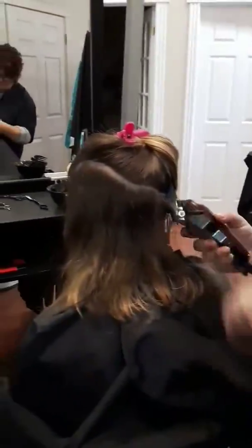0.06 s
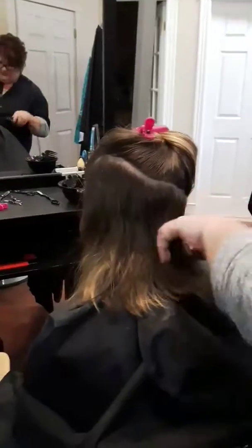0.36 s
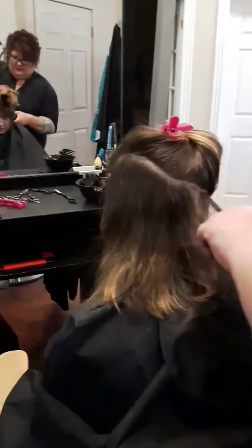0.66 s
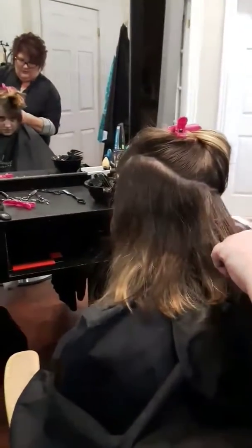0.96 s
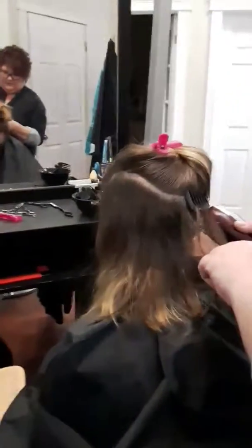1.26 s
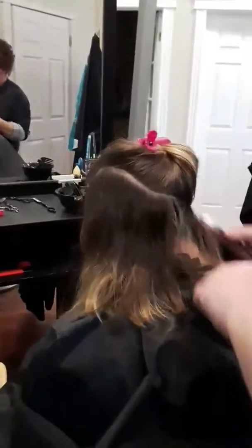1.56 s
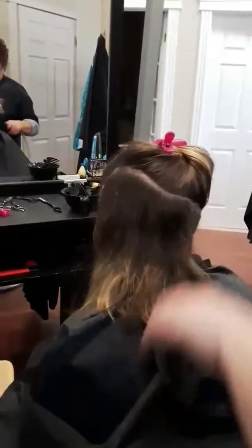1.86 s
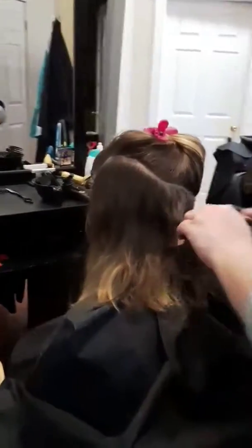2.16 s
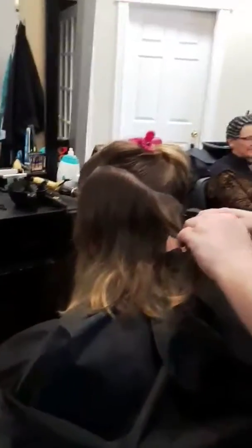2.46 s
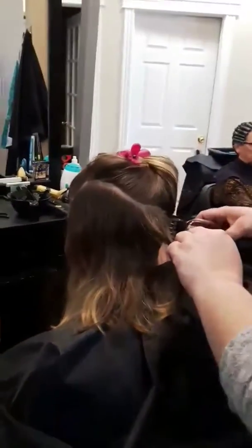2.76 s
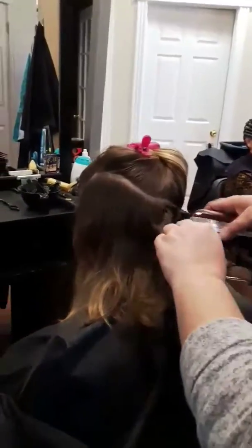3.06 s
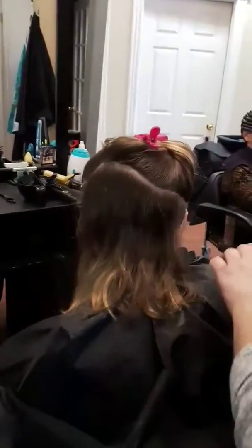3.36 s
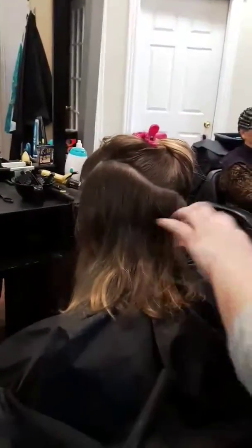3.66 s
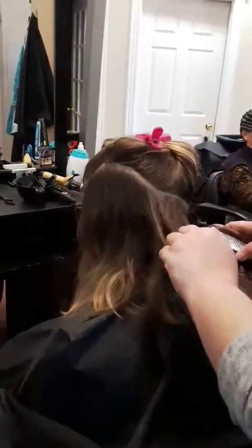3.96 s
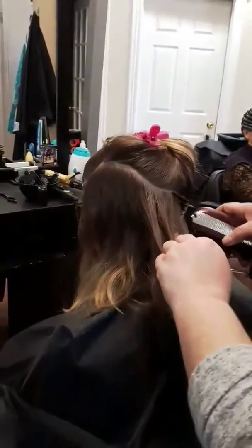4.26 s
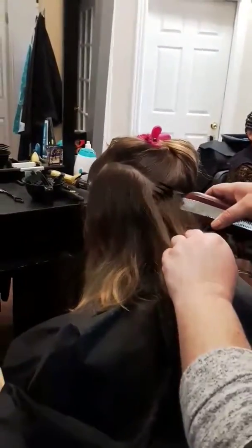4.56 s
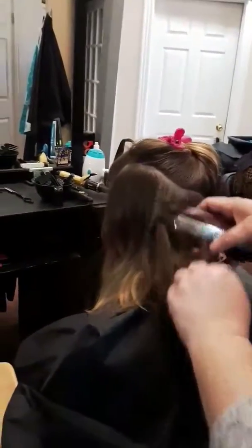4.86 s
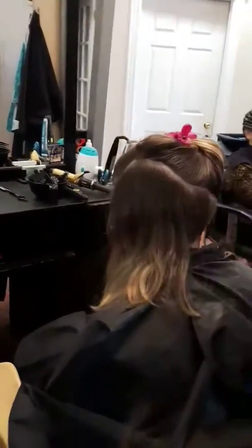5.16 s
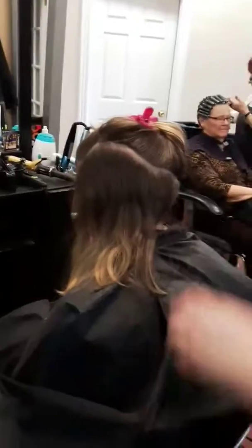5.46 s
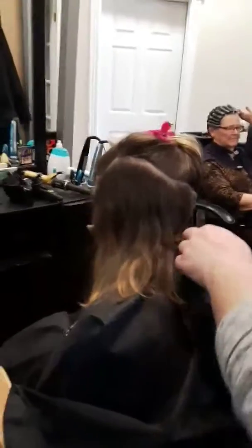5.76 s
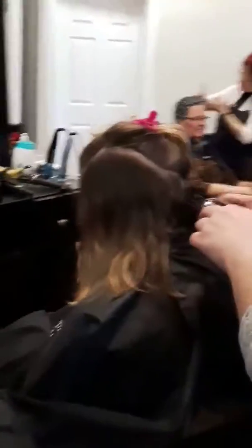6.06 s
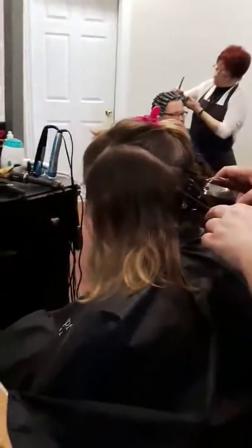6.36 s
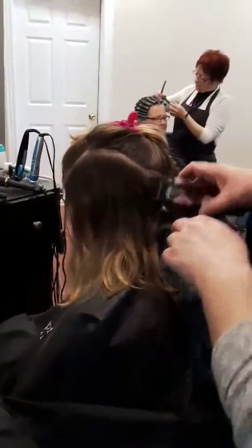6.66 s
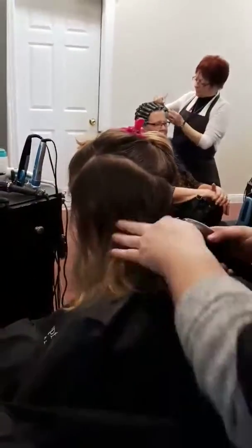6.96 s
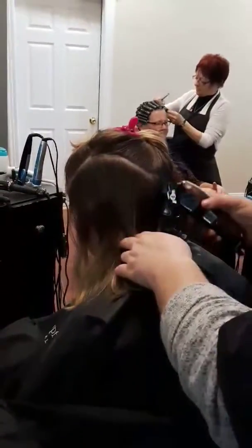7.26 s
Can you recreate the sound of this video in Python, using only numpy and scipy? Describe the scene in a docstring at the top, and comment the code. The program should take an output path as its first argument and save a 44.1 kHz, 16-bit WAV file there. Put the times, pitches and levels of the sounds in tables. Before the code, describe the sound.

Electric clippers buzz softly close by throughout, their light whine swelling around 1.7, 4 and 5 to 5.5 seconds. Beneath them, salon ventilation blows and rumbles steadily with a prominent low hum that wavers in pitch. Further into the room, what sounds like a spray bottle puffs nine times, about every 0.75 seconds from 0.5 to 6.8 seconds, each a short spit and hiss of mist. The blade cuts through hair with a faint, bright crackle from about 1.1 to 1.8 seconds and again from 4.2 to 5. A light click comes at 0.6 seconds, and soft, dull knocks at 1.4, 2.1 and 2.6. A cape rustles briefly near 1.5, 4.7 and 5.7 seconds. More knocks cluster between 5.3 and 5.8 seconds, with a short, brighter clatter of plastic set down at 5.4. The deep rumble drops near 6.8 seconds while the clippers continue.

```python
"""Electric clippers buzz close by in a hair salon, their housing ringing with the stroke of the blade.
Twice the blade bites into a lock and hairs snap against its teeth. Further into the room, what sounds
like a spray bottle puffs about every 0.75 s, each squeeze a spit of drops and a jet of mist.
The cape rustles, a few things are knocked softly, and one is set down with a brighter clatter.
Under it all a low hum wavers, and the ventilation blows and rumbles."""
import sys
import numpy as np
from scipy import signal
from scipy.fft import rfft, irfft, next_fast_len
from scipy.io import wavfile

SR = 44100
rng = np.random.default_rng(int(sys.argv[2]) if len(sys.argv) > 2 else 0)


def store_wav(level_fs):
    """Save 16-bit WAV to argv[1]."""
    pcm = np.round(np.clip(np.atleast_2d(level_fs), -1, 1) * 32767)
    wavfile.write(sys.argv[1], SR, pcm.T.astype(np.int16))


N = 330731
TIME = np.arange(N) / SR
STROKE_HZ = 120.2   # back-and-forth rate of the blade


# The housing comes and goes as the hand turns. Each row: time in seconds, base level in dB.
HOUSING_CURVE = [(0.0, -89), (0.08, -59.5), (1.5, -68), (1.72, -56.5), (2.3, -63), (2.6, -62), (2.8, -65),
                 (3.8, -64), (3.95, -55), (4.22, -68), (4.95, -66), (5.05, -55.5), (5.4, -61), (5.55, -54),
                 (5.9, -59.5), (6.5, -63.5), (6.85, -59), (7.2, -63), (7.45, -57.5)]
# The housing's resonances. Each row: pitch in Hz, width in Hz, relative level in dB.
HOUSING_RESONANCES = [(719, 39.5, 3), (689, 50, -8.5), (766, 77, -11.5)]

def clipper_housing(ring_db=-2.5, whine_db=-5.0, whine_growth=1.7, buzz_db=-20.5):
    """The housing rings near the stroke's sixth harmonic and whines when loudest, over a faint buzz."""
    level_db, = in_time(HOUSING_CURVE)
    stroke = 2 * np.pi * np.cumsum(STROKE_HZ + 1.3 * drift(18)) / SR
    harmonics = sum(drift(4.5) * np.sin(k * stroke) for k in range(3, 15))
    buzz = from_db(level_db + buzz_db) * unit_rms(harmonics)
    ring = from_db(level_db + ring_db) * ringing(HOUSING_RESONANCES)
    top_db = level_db.max()
    whine_gain = from_db(top_db + whine_db + whine_growth * (level_db - top_db))
    return ring + buzz + whine_gain * np.sqrt(2) * np.sin(6 * stroke)


def snapping(per_s, friction_db=-4.5):
    """Hairs snap at random, a few much harder, and more often as the teeth close; friction hisses."""
    sizes = from_db(4 * np.minimum(rng.exponential(1, N), 2.7)) * rng.choice([-1, 1], N)
    closing = 1 + .3 * np.cos(2 * np.pi * STROKE_HZ * TIME)
    breaks = rng.random(N) < closing * per_s / SR
    snaps = sizes * breaks / np.sqrt(np.maximum(per_s, 1))   # denser, but no louder
    return unit_rms(unit_rms(snaps) + from_db(friction_db) * rng.standard_normal(N))


# The blade's bright ring. Each row: pitch in Hz, width in Hz, relative gain in dB.
BLADE_RESONANCES = [(7740, 730, 3), (9150, 1500, 2), (11440, 1100, -1.5), (14750, 2900, 5)]
# The blade grazes the hair. Each row: start in seconds, length in seconds, level in dB.
HAIR_GRAZES = [(0.087, .03, -82), (0.177, 0.046, -86), (6.254, .16, -96), (7.1, .18, -90.5)]
# Two passes through a lock, one list each. Each row: time in seconds, level in dB, snaps per second,
# send to the comb's rasp in dB, send to the lowest blade resonance in dB.
LOCK_PASSES = [
    [(1.12, -92, 520, -6, -5), (1.24, -74, 700, -3, -4), (1.37, -74, 670, -6, 1), (1.43, -78, 440, -1, 3),
     (1.52, -81, 350, -3, 5), (1.565, -72, 1400, -14, -4), (1.64, -86, 1000, -6, -3),
     (1.7, -83, 800, -8, 4), (1.8, -89, 640, -6, 0)],
    [(4.2, -89, 1200, -4, 4), (4.34, -86, 1200, 3, 3), (4.385, -75.5, 1200, 5, 2),
     (4.47, -83, 1600, -8, -2), (4.55, -82, 2500, 5, 0), (4.67, -74, 1000, 5.5, -3),
     (4.735, -74, 1300, 6, -6), (4.775, -91, 1500, 0, -1), (4.81, -78, 2500, 1, -1),
     (4.855, -71.5, 1800, 1, 1), (4.92, -77, 1400, -6, 2), (5.03, -86, 1200, 2, 2)],
]

def cutting(stray_db=-92, stray_per_s=1000, graze_send_db=2.5, fade_s=.03, crack_db=-9.5):
    """The blade snaps hairs, each ringing it in its own mix; a thick lock also rasps on the comb."""
    grazes = sum(from_db(db) * swell(start, length, .012, .014) for start, length, db in HAIR_GRAZES)
    snaps = (from_db(stray_db) + grazes) * snapping(stray_per_s)
    low_send = from_db(graze_send_db) * snaps
    rasp_send = 0
    for rows in LOCK_PASSES:
        level_db, per_s, rasp_db, low_db = in_time(rows)
        start, end = rows[0][0], rows[-1][0]
        cut = from_db(level_db) * swell(start, end - start, fade_s, fade_s) * snapping(per_s)
        snaps += cut
        low_send += from_db(low_db) * cut
        rasp_send += from_db(rasp_db) * cut
    ring = 0
    for k, (hz, width, db) in enumerate(BLADE_RESONANCES):
        strikes = (low_send if k == 0 else snaps) * rng.standard_normal(N)
        ring += from_db(db) * resonate_twice(strikes, hz, width)
    rasp = low_pass(resonate(rasp_send, hz=3380, width_hz=600), 3700, order=16)
    return snaps.std() * unit_rms(ring) + from_db(crack_db) * snaps + rasp_send.std() * unit_rms(rasp)


# Single cracks that stand out of the cut. Each row: start in seconds, level in dB.
COARSE_SNAPS = [(1.254, -69), (1.274, -72), (1.308, -64), (1.339, -64), (1.372, -71), (1.3937, -71),
                (4.731, -69)]

def coarse_hairs():
    """Coarse hairs crack singly against the blade and ring its upper resonances."""
    cracks = sum(from_db(db) * swell(start, hold_s=.00047, rise_s=.0002, fall_s=.00066)
                 for start, db in COARSE_SNAPS)
    return ringing(BLADE_RESONANCES[1:]) * cracks


# Hair snaps and light clicks. Each row: start in seconds, level in dB, pitch in Hz, decay in seconds.
BRIGHT_PINGS = [(0.133, -70, 8800, .0012), (0.192, -66, 9300, .0012), (0.641, -58.5, 1895, 0.0075),
                (1.046, -67, 9140, 0.0016), (1.4288, -67, 7760, .0018), (1.466, -67, 7880, 0.0022),
                (1.496, -68, 7890, .002), (1.5188, -63, 7860, .002), (6.642, -70, 9000, .001)]

def bright_pings():
    """Short, bright pings: hairs snapping on the blade, and a few light clicks."""
    return sum(from_db(db) * swell(start, 0, .00016, decay_s) * np.sin(2 * np.pi * hz * TIME)
               for start, db, hz, decay_s in BRIGHT_PINGS)


# A weak puff leads into each squeeze.
# Each row: peak time in seconds, level in dB before the mist trim, swell time in seconds.
WEAK_PUFFS = [(.452, -68.5, .02), (1.114, -63.5, 0.016), (1.87, -66, .014), (2.6, -69, .008),
              (3.36, -58.5, 0.014), (4.036, -60.5, 0.0055), (5.172, -67, .007), (5.982, -55, .012),
              (6.792, -69, .008)]
# Squeezes of the bottle. Each row: start in seconds, length in seconds, base level in dB,
# level of the first drops in dB relative to that base.
BOTTLE_SQUEEZES = [(0.496, 0.052, -54, -1.5), (1.152, 0.056, -54.5, -5), (1.897, 0.056, -52, -3.5),
                   (2.659, 0.054, -54, -3), (3.429, .052, -54, -6), (4.086, 0.049, -52.5, -4),
                   (5.187, 0.043, -54, -7), (6.042, .054, -53, -2.5), (6.805, 0.049, -54.5, -4)]
# The hiss of fine mist. Each row: frequency in Hz, relative level in dB.
MIST_SPECTRUM = [(500, 22), (900, 9), (1600, 5), (2400, 3.5), (3800, 1.5), (6000, -3.5), (6750, 1),
                 (7200, -0.5), (10000, 2.5), (13500, 6.5), (15500, 7)]
# The duller spit of coarse drops. Each row: frequency in Hz, relative level in dB.
DROPS_SPECTRUM = [(300, -1), (600, 14), (900, 13), (1500, 7.5), (2400, -2), (3800, -5), (6000, -30),
                  (15000, -24)]

def spray_bottle(puff_hold_s=.011, puff_fall_s=.03, sag_db_per_s=26, sputter_db=1.6, mist_trim_db=-.34):
    """After a weak puff, each squeeze spits coarse drops and a jet of mist that sags with the pressure."""
    flow, spit = 0, 0
    for peak, db, swell_s in WEAK_PUFFS:
        before = (peak - TIME) / swell_s
        after = (TIME - peak - puff_hold_s) / puff_fall_s
        flow += from_db(db) * np.exp(-np.clip(np.maximum(before, after), 0, 20))
    for start, length, db, drops_db in BOTTLE_SQUEEZES:
        sag_db = sag_db_per_s * np.clip(TIME - start, 0, length)
        flow += from_db(db - sag_db) * swell(start, length, rise_s=.015, fall_s=.015)
        spit += from_db(db + drops_db) * swell(start + .0019, hold_s=.014, rise_s=.0019, fall_s=.021)
    mist = flow * from_db(mist_trim_db + sputter_db * drift(130)) * coloured_noise(MIST_SPECTRUM)
    return mist + spit * coloured_noise(DROPS_SPECTRUM)


# Soft knocks. Each row: start in seconds, level in dB before dulling, low-pass cutoff in Hz.
SOFT_KNOCKS = [(0.638, -59, 2600), (1.411, -48, 1050), (2.133, -59.5, 1620), (2.586, -52.5, 891),
               (5.30, -56.5, 1509), (5.376, -50.5, 1200), (5.42, -58, 2400), (5.528, -53.5, 1085),
               (5.644, -52, 1570), (5.764, -50, 1404), (5.807, -68, 2652)]
# The body of a knock. Each row: frequency in Hz, relative level in dB.
KNOCK_SPECTRUM = [(100, -19), (280, -18), (450, 9), (600, 6.5), (800, 7.5), (1000, 0.5), (1400, 0),
                  (2500, -9), (6000, -19.5)]

def knocks(rise_s=.00025, contact_db=-4.5):
    """Things are knocked further off: a brief contact, then a dull, dense burst."""
    body = coloured_noise(KNOCK_SPECTRUM)
    sound = 0
    for start, db, cutoff_hz in SOFT_KNOCKS:
        contact = from_db(contact_db) * swell(start, hold_s=rise_s, rise_s=rise_s, fall_s=.005)
        burst = swell(start, hold_s=.015, rise_s=rise_s, fall_s=.034)
        sound += from_db(db) * (contact + burst) * low_pass(body, cutoff_hz)
    return sound


# The ring of hard plastic. Each row: pitch in Hz, width in Hz, relative level in dB.
PLASTIC_RESONANCES = [(1460, 715, -1), (2200, 390, -1), (2950, 900, -2), (3710, 570, -1), (5070, 1500, -8),
                      (7600, 800, -14), (12500, 7000, -12)]

def plastic_clatter(start_s=5.385, level_db=-59):
    """A plastic thing is set down with a short, bright clatter."""
    envelope = swell(start_s, hold_s=.018, rise_s=.00082, fall_s=.022)
    return from_db(level_db) * envelope * ringing(PLASTIC_RESONANCES)


# Brushes of cape and comb.
# Each row: start in seconds, length in seconds, level in dB before dulling, low-pass cutoff in Hz.
CAPE_BRUSHES = [(1.522, 0.07, -56, 2530), (4.618, 0.11, -60.5, 2010), (4.8, 0.084, -59.5, 2400),
                (5.677, 0.17, -63, 1800)]
# The tone of the rustle. Each row: frequency in Hz, relative level in dB.
RUSTLE_SPECTRUM = [(300, -34), (700, -1), (1400, -0.5), (2500, -9.5), (3200, -12.5), (3900, -18),
                   (5500, -22), (9000, -21), (15000, -14)]

def cape_rustle(grain_db=-1.5):
    """Cloth and comb slide with an uneven grain."""
    friction = coloured_noise(RUSTLE_SPECTRUM) * from_db(grain_db * drift(220))
    return sum(from_db(db) * swell(start, length, .022, .054) * low_pass(friction, cutoff_hz, order=1)
               for start, length, db, cutoff_hz in CAPE_BRUSHES)


# The low hum, mostly deeper where it is strong.
# Each row: time in seconds, pitch in Hz, level in dB before the trim.
HUM_CURVE = [(0.0, 134.6, -44.5), (0.18, 146.5, -43.5), (0.3, 126.4, -43.5), (0.48, 120.2, -35),
             (0.7, 151.3, -43), (1.08, 149.5, -47), (1.26, 131.6, -46), (1.44, 151, -43.5),
             (1.52, 132.2, -47), (1.74, 147, -42.5), (2.03, 120.7, -39.5), (2.2, 137.2, -39.5),
             (2.4, 124.5, -42), (2.7, 119, -40.5), (2.84, 132, -42), (3.0, 126.7, -42.5),
             (3.32, 160.4, -44.5), (3.54, 142, -51), (3.74, 132.3, -43), (4.08, 139.3, -42),
             (4.22, 128, -45.5), (4.66, 135, -42.5), (4.8, 121.9, -45.5), (5.04, 133, -39),
             (5.28, 123, -39.5), (5.56, 128, -44.5), (5.66, 142.7, -46.5), (6.06, 135.4, -48),
             (6.3, 137, -49.5), (6.77, 125.2, -44), (6.86, 168.2, -48), (7.3, 164.2, -53.5),
             (7.5, 171, -45)]

def low_hum(waver_hz=8.5, throb_db=-0.2, trim_db=-3):
    """A low, nearly pure hum wavers in pitch, swelling and fading."""
    pitch, level_db = in_time(HUM_CURVE)
    waver, throb = drift(15), drift(12)
    phase = 2 * np.pi * np.cumsum(pitch + waver_hz * waver) / SR
    return from_db(level_db + trim_db + throb_db * throb) * np.sqrt(2) * np.sin(phase)


# The bed of moving air. Each row: frequency in Hz, relative level in dB.
AIR_SPECTRUM = [(30, -26.5), (125, -13.5), (170, 4.5), (205, 2.5), (245, 0.7), (300, 0.3), (390, -5.5),
                (490, -13), (660, -11), (850, -16), (1150, -21.5), (1450, -24.5), (2000, -31.5),
                (3300, -38.5), (5200, -51), (11000, -55), (15000, -58)]
# The deep rumble beneath it. Each row: frequency in Hz, relative level in dB.
RUMBLE_SPECTRUM = [(20, -8.5), (40, -11), (65, -5), (90, -2), (115, 2.5), (160, -6), (300, -61.5)]

def ventilation(air_db=-47.5, flutter_db=.53, rumble_db=-51.5, surge_db=1.9, sink_at_s=6.78):
    """Steady moving air whose treble flutters a little, with a surging rumble that sinks near the end."""
    air = coloured_noise(AIR_SPECTRUM)
    treble = signal.sosfilt(signal.butter(1, 1100, "high", fs=SR, output="sos"), air)
    air += treble * (from_db(flutter_db * drift(9.9)) - 1)
    sink_db = 12.5 * np.clip((TIME - sink_at_s) / .058, 0, 1)
    rumble = from_db(rumble_db - sink_db + surge_db * drift(4.0)) * coloured_noise(RUMBLE_SPECTRUM)
    return from_db(air_db) * air + rumble


def salon(x, wet_db, t60_s=.68, wall_hz=11000):
    """The room follows the direct sound with a diffuse tail, a little dulled by the walls."""
    t = np.arange(SR) / SR
    decay = from_db(-60 * t / t60_s) * (t > .006)   # 6 ms of pre-delay
    tail = low_pass(rng.standard_normal(SR), wall_hz, order=1) * decay
    return x + from_db(wet_db) * signal.fftconvolve(x, tail / np.linalg.norm(tail))[:N]


def from_db(db):
    """Decibels to gain."""
    return 10 ** (np.asarray(db) / 20)


def unit_rms(x):
    """Scale to unit power."""
    return x / np.sqrt(np.mean(x ** 2) + 1e-20)


def in_time(rows):
    """Automation: each column after the time, drawn out to every sample."""
    times, *columns = np.transpose(rows)
    return [np.interp(TIME, times, column) for column in columns]


def swell(start_s, hold_s, rise_s, fall_s):
    """An envelope that opens, then dies away from hold_s after its start."""
    t = TIME - start_s
    return np.clip(t / rise_s, 0, 1) * np.exp(-np.clip((t - hold_s) / fall_s, 0, 20))


def coloured_noise(spectrum):
    """Unit noise with the given spectrum."""
    hz, db = np.transpose(spectrum)
    size = next_fast_len(N)
    log_hz = np.log(np.maximum(np.fft.rfftfreq(size, 1 / SR), 1))
    gain = from_db(np.interp(log_hz, np.log(hz), db))
    return unit_rms(irfft(rfft(rng.standard_normal(size)) * gain, size)[:N])


def low_pass(x, hz, order=2):
    """Butterworth low-pass."""
    return signal.sosfilt(signal.butter(order, hz, fs=SR, output="sos"), x + 1e-18)


def drift(rate_hz):
    """A smooth random wander with spread 1."""
    return unit_rms(low_pass(rng.standard_normal(N + SR), rate_hz)[SR:])


def resonate(x, hz, width_hz):
    """A resonance with gain 1 at its peak."""
    r = np.exp(-np.pi * width_hz / SR)
    feedback = [1, -2 * r * np.cos(2 * np.pi * hz / SR), r * r]
    return signal.lfilter(np.array([1, 0, -1]) * (1 - r * r) / 2, feedback, x + 1e-18)


def resonate_twice(x, hz, width_hz):
    """Two like resonances in series: a narrower peak with steeper skirts."""
    return resonate(resonate(x, hz, width_hz), hz, width_hz)


def ringing(modes):
    """Unit noise held in a body's resonances."""
    return unit_rms(sum(from_db(db) * unit_rms(resonate_twice(rng.standard_normal(N), hz, width))
                        for hz, width, db in modes))


def scene():
    """Clippers close by, spray and knocks further into the room, hum and ventilation beneath; in mono."""
    hum = low_hum()
    clippers = clipper_housing() + salon(cutting() + coarse_hairs() + bright_pings(), wet_db=-8.5)
    spray = salon(spray_bottle(), wet_db=-10.5)
    handling = salon(knocks() + plastic_clatter() + cape_rustle(), wet_db=-9.0)
    return (clippers + spray + handling + hum + ventilation())[None]


def record(dry):
    """The top is cut steeply above 15550 Hz."""
    return signal.sosfilt(signal.ellip(12, .1, 80, 15550, fs=SR, output="sos"), dry)


dry = scene()
out = record(dry)
store_wav(out)
```